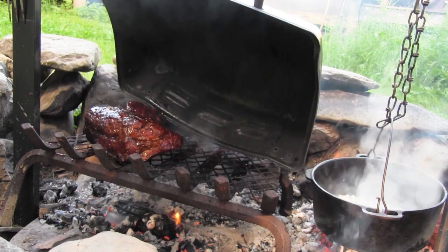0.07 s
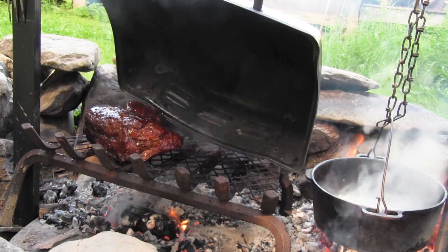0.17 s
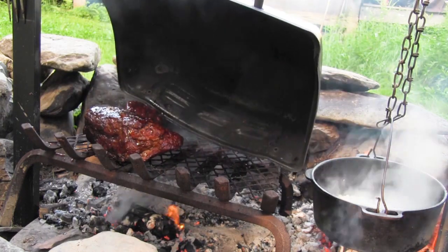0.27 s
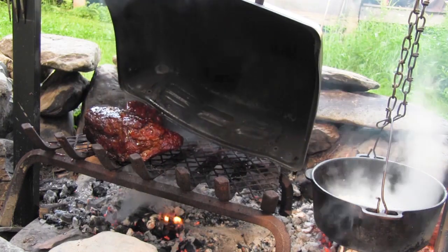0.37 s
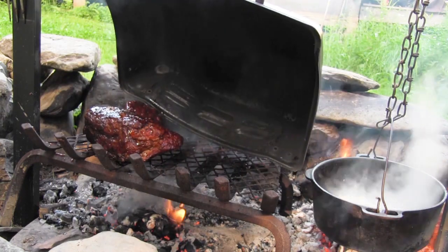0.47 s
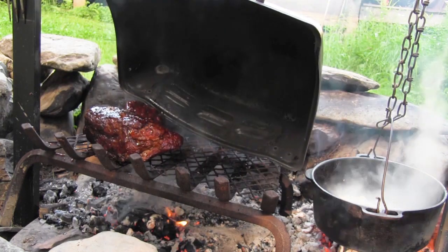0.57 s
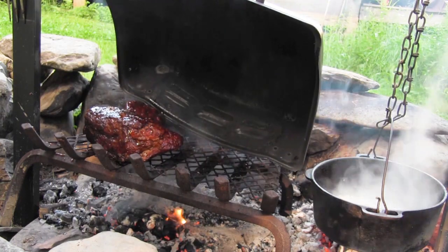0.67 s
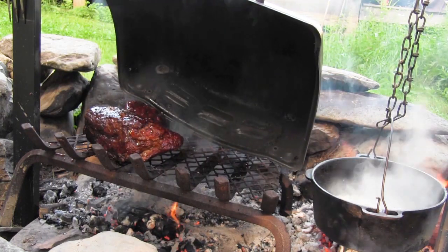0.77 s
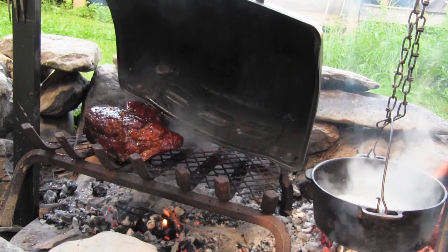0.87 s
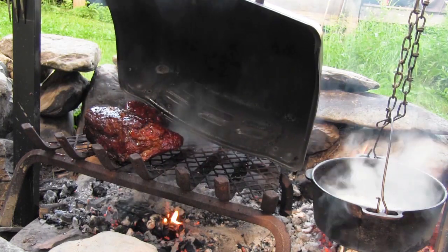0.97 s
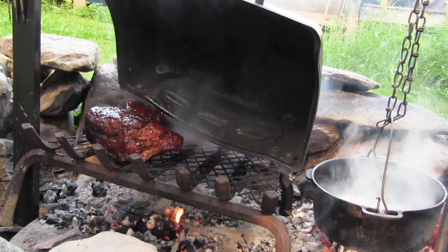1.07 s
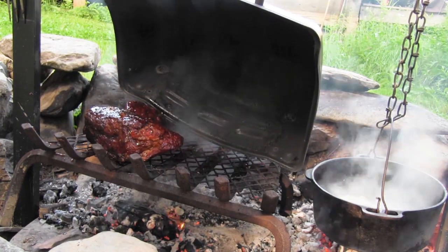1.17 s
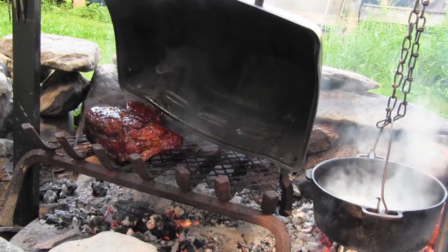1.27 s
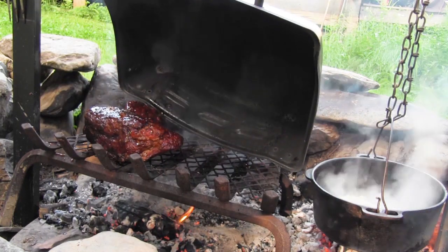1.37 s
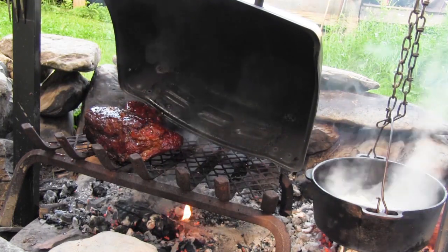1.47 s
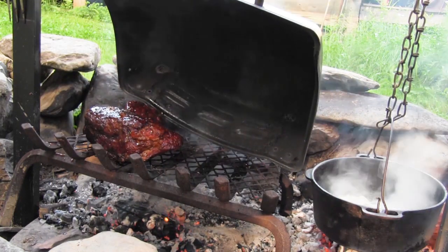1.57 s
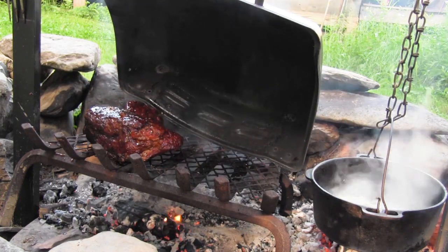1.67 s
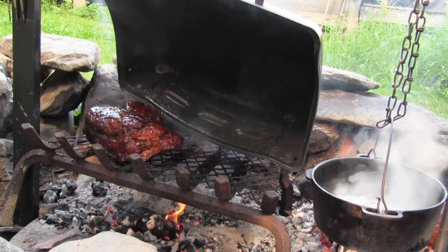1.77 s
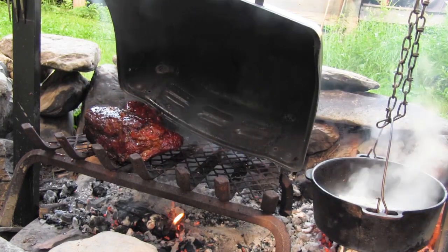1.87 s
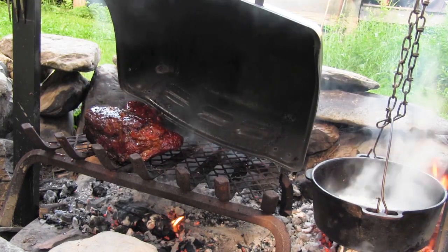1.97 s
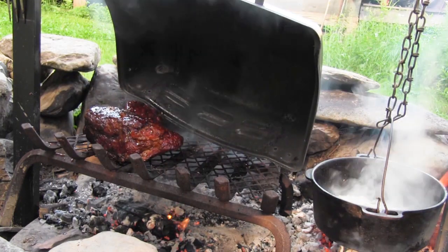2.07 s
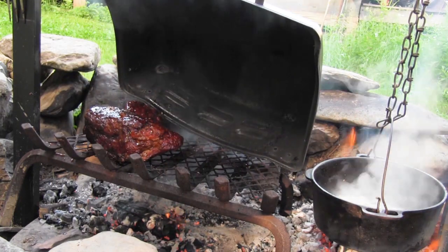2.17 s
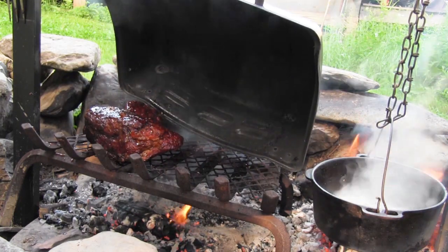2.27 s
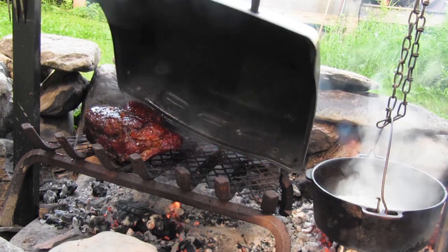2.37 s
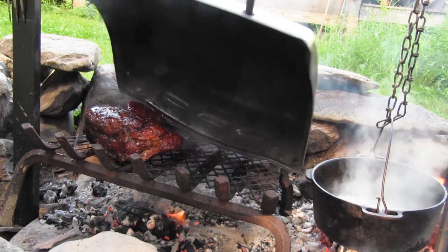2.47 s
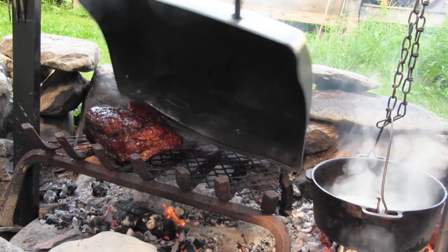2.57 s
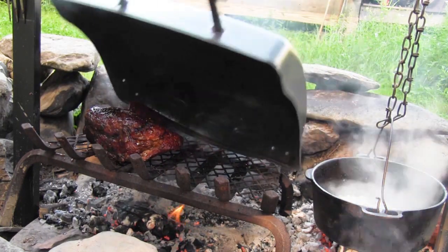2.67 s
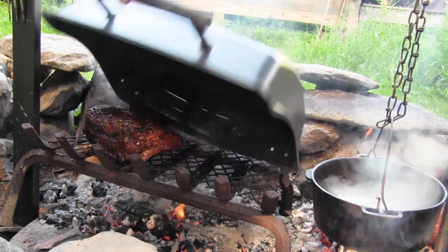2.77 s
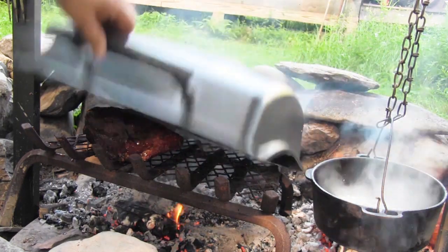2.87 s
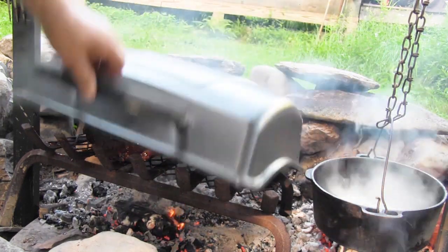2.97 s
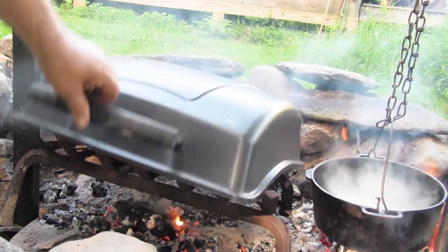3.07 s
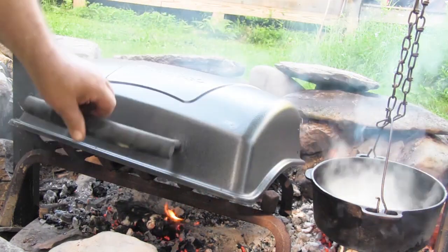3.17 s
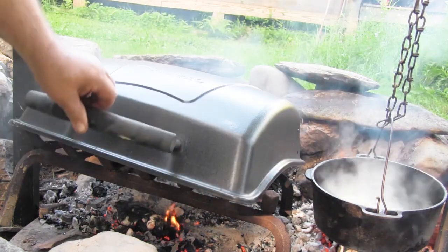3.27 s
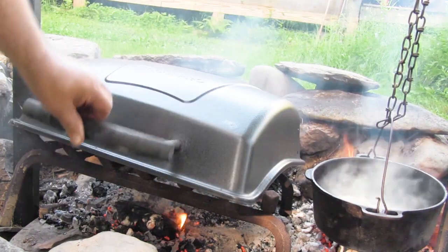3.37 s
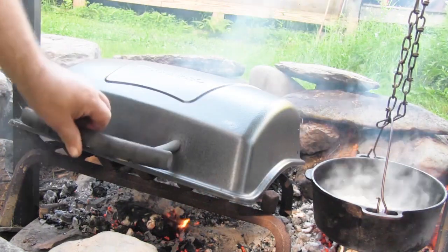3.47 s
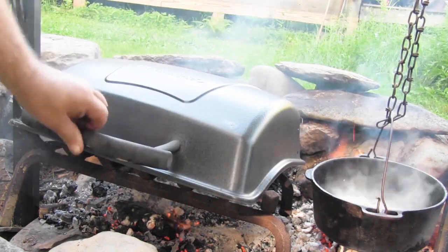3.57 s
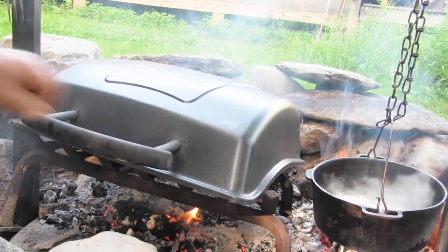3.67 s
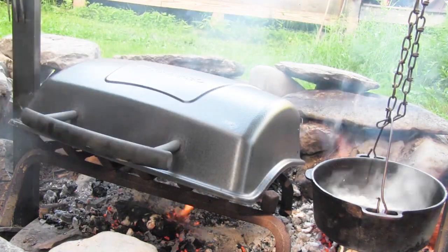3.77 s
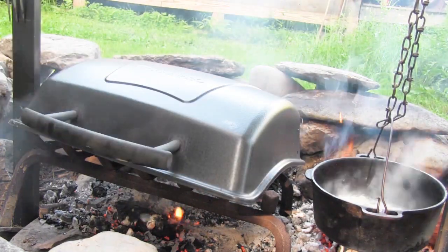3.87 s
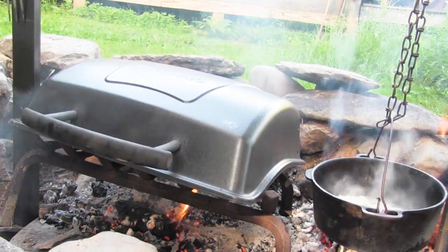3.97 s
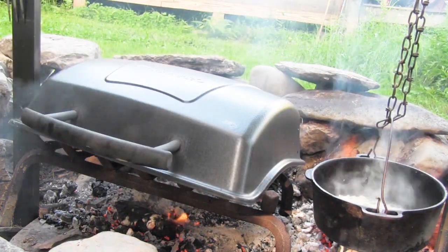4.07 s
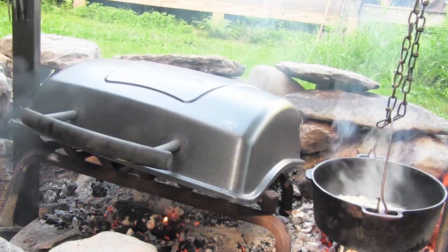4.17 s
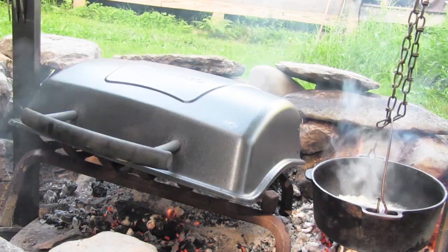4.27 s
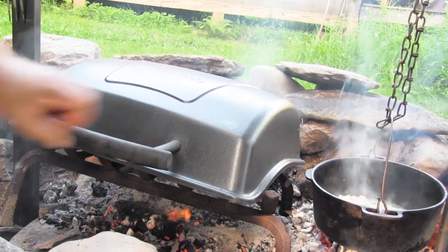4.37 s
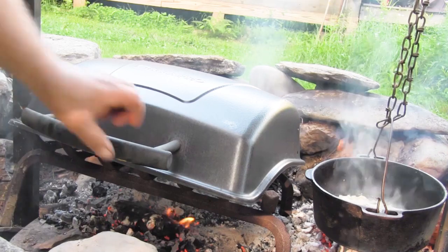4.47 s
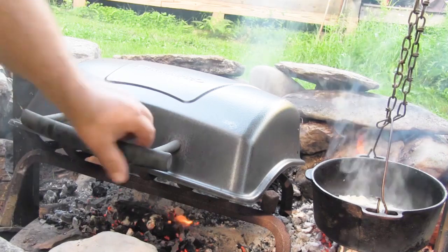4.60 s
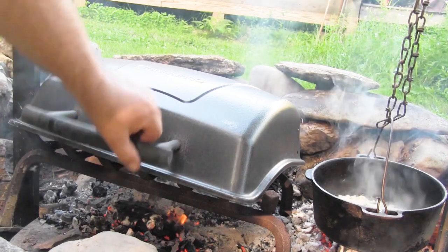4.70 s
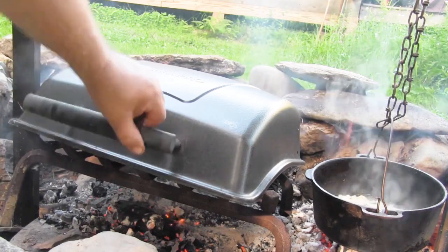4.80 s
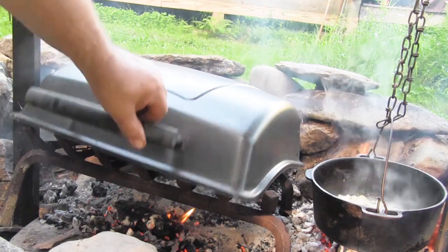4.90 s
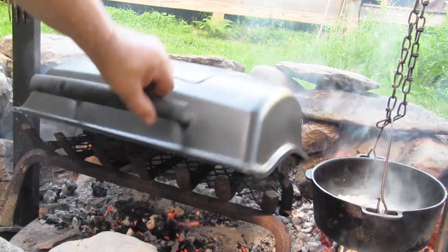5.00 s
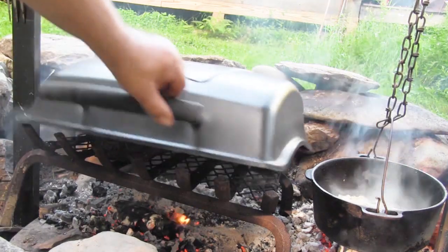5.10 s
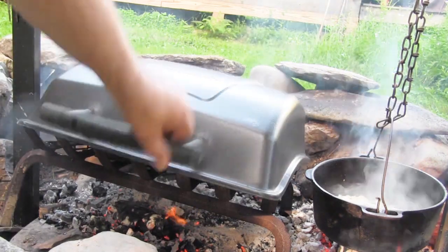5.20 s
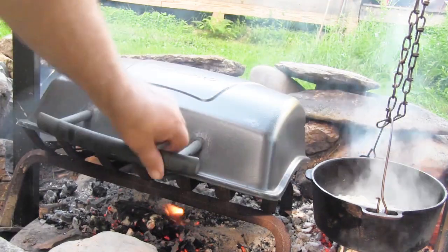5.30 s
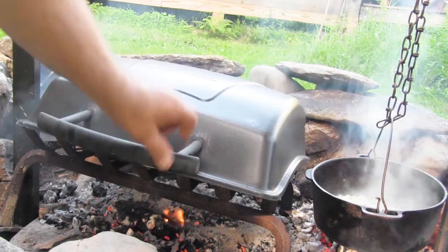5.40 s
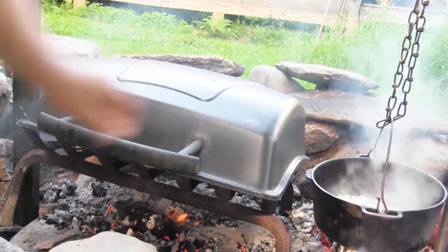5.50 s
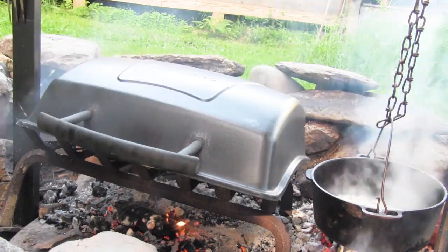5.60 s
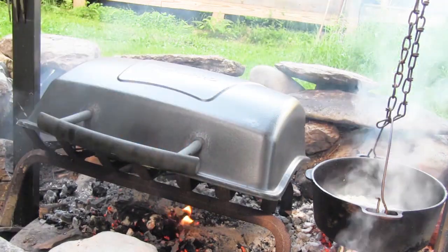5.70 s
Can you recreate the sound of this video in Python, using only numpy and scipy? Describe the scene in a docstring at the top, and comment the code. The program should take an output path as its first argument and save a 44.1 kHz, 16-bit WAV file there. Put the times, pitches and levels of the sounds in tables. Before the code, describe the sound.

Close stereo pickup outdoors at a campfire. Fat sizzles and spits over coals with low flame flutter and tiny ember snaps. After about two and a half seconds a steel hood is gripped, creaks over, screeches briefly on iron bars and slams shut with clattering, ringing bangs. A quieter pause follows, then a grip rattle, a lift and a second cluster of loud clangs, ending with short scraping squeals and a fading iron ring.

```python
"""A sheet-steel grill hood stands open on an iron grate over a campfire, a metre from the microphone.
It is tipped forward, screeches along the bars and drops shut; then it is lifted, dropped again and pushed
into place. Noise-like sheet modes, clear decaying notes and stick-slip jerks make the hood and grate.
Underneath, fat sizzles on the coals, flames flutter and embers tick, all from shaped noise."""
import sys
import numpy as np
from scipy import signal
from scipy.fft import rfft, irfft, next_fast_len
from scipy.io import wavfile

SR = 44100
rng = np.random.default_rng(int(sys.argv[2]) if len(sys.argv) > 2 else 0)


def wav_out(sig):
    """Save sig, one row per channel (or a flat mono array), as 16-bit PCM at SR to the path in sys.argv[1]."""
    wavfile.write(sys.argv[1], SR, np.round(np.clip(np.atleast_2d(sig).T, -1, 1) * 32767).astype(np.int16))


N = 253134
T = np.arange(N) / SR

# Blows of hood on grate: tipped over its back edge, dropped shut, rocking, then lifted and dropped again.
# Each row: start in seconds, strength in dB, then relative to it in dB: weight (low thump), hardness
# (treble), free notes of the hood, ring of the grate.
BLOWS = [(2.587, -24, -23, 7, 2, -4), (2.755, -25.5, -17, 3, -13, -4.5), (2.862, -15.5, -17, -6, -18, -11),
         (2.895, -17, -11.5, -4, -13, -8.5), (2.938, -27.5, 3.5, -22, -14, -6.5),
         (3.038, -16.5, 1.5, -11, -26, -18), (3.085, -15.5, 0, -13, -15, -8.5),
         (3.385, -28, -6.5, -11.5, 0, -3.5), (3.506, -28, -4, -4, -11, -8),
         (4.563, -23.5, -5.5, -7, -1, -14), (4.932, -19, -1, -15.5, -14, -19),
         (4.948, -18, -4.5, -11.5, -7.5, -14.5), (5.155, -14, -5, -5.5, -13, -5.5),
         (5.215, -27.5, 4, -8, -10, -12), (5.246, -16, -3.5, -10, -11, -6),
         (5.260, -13.5, -2, -4, -15, -2.5), (5.302, -30.5, -1, -10, -17, 5)]
# Free notes of the hood. Each row: pitch [Hz], level standing [dB], level lying [dB], 60 dB decay [s].
FREE_MODES = [(477.4, -3, -7, 0.51), (654.6, 1.5, -7, 0.35), (715, 1, -14.5, 0.84), (960, -7, -4, 0.84),
              (1175, 0, -15, 0.48), (1420, -8, -15, 0.14), (1660, -14, -10, 0.26), (2050, -9, -23, 0.64),
              (2197, 1.5, -22, 0.25), (3820, -10, -18.5, 0.2), (4200, 0, -20, 0.13), (4570, 0.5, -22, 0.15)]
# Notes of the hood lying on its rim. Each row: pitch [Hz], relative level [dB], 60 dB decay [s].
RIM_MODES = [(235.8, -3.5, 0.13), (256.5, -3, 0.3), (605.7, -5, 0.59), (854, -11.5, 0.99),
             (891, -4.5, 0.61), (1155, 1, 0.11), (1170, 1.5, 0.33), (1180, -3.5, 0.4), (1223, 4, 0.2),
             (1322, 5, 0.15), (1375, 1.5, 0.083), (1444, -2.5, 0.21), (1470, -7, 0.4), (1596, -6.5, 0.31),
             (1715, -8.5, 0.33), (3160, -17.5, 0.24), (4290, -10.5, 0.2)]
# Notes of the iron grate. Each row: pitch [Hz], relative level [dB], 60 dB decay [s].
GRATE_MODES = [(420, -18, 1.55), (480, -15, .6), (511.3, -6, 1.52), (528, -3.5, 1.17), (729, -14, 1.45),
               (870, -23, 1.4), (963, -7.5, 1.44), (1024, -6.5, 0.95), (1336, -16, 0.51), (1470, -20, 1.1),
               (1840, -19, 0.94), (1906, -15, 0.92), (2410, -21, 0.82), (2570, -10, 0.83), (2930, -30, 1.1)]
# Short thump under each blow. Each row: pitch [Hz], relative level [dB], 60 dB decay [s].
THUMP_MODES = [(109, -2, 0.05), (153.6, 5.5, 0.048), (241.4, 0, 0.043)]
# Spectrum of the many small sheet modes. Each row: frequency [Hz], level lying [dB], level standing [dB].
SHEET = [(50.7, -43, -37), (113, -15.5, 0), (258, 9.5, 8.5), (347, -8.5, -21), (540, -6.5, -2),
         (800, -9.5, 1.5), (900, -3.5, 2.5), (1114, -1, -4), (1155, 1.5, -5.5), (1420, -2.5, 3),
         (1516, -6.5, -8), (1730, -13.5, -13), (2460, -3, -6.5), (2770, 0, -13), (4450, -3, -10),
         (6460, -4.5, -13), (9700, -18, -25), (15200, -35, -42)]
# Decay of the sheet modes. Each row: frequency [Hz], 60 dB decay [s].
SHEET_T60 = [(150, 0.33), (600, 0.36), (1200, 0.35), (2500, 0.53), (5000, 0.24), (12000, 0.2)]
# The rim dragging on the bars. Each row: start [s], length [s], strength [dB], relative hardness [dB].
DRAGS = [(2.819, 0.16, -22, -9.5), (3.109, 0.048, -25.5, -10.5), (4.921, 0.053, -24.5, -12),
         (5.003, 0.14, -38.5, -9.5), (5.316, 0.094, -27, -15)]
# The rim catching and squealing. Each row: start [s], length [s], level [dB], pitch [Hz].
SQUEALS = [(2.603, 0.036, -27, 716), (2.88, 0.095, -13, 724), (2.853, 0.067, -15, 850),
           (3.165, 0.12, -35, 528), (3.295, 0.025, -49, 2610), (5.265, 0.05, -24.5, 508),
           (5.335, .03, -25, 500), (5.39, 0.035, -22, 520)]
# The hand taking the handle. Each row: start [s], strength [dB], relative weight [dB], top frequency [Hz].
GRIPS = [(2.37, -33.5, -6, 3570), (2.395, -30.5, -6.5, 5270), (4.757, -29, -6.5, 1940),
         (4.807, -34, -3, 905)]
# Fat splashing on the coals. Each row: start [s], relative hiss [dB], relative frying [dB], 60 dB decay [s].
SPLASHES = [(0.0, -34, -39, 2.62), (0.44, -43.5, -48.5, 2.3), (0.955, -41.5, -66, 2.2),
            (1.04, -39, -76, 0.37), (1.842, -43.5, -54, 1.75), (2.1, -48, -56, 46)]
# Spectrum of the sizzle. Each row: frequency [Hz], relative level [dB].
HISS = [(1200, -93), (2200, -31.5), (3200, -16), (4000, -16.5), (6000, -13.5), (7500, -17.5), (10500, -24),
        (12500, -31), (16000, -46)]
# Ringing bands of the sizzle. Each row: centre [Hz], width [Hz], relative level [dB].
HISS_BANDS = [(2230, 260, -11.5), (3900, 87, -22), (4600, 120, -18.5), (5800, 740, -26)]
# Embers snapping. Each row: start [s], relative level [dB], pitch [Hz] around which the noise band lies.
EMBERS = [(0.124, -31, 2230), (1.3203, -31.5, 6200), (1.357, -29, 4940), (1.391, -43.5, 5000),
          (1.7768, -38, 3650), (1.8595, -48, 5410), (2.236, -33.5, 6060), (2.4718, -26.5, 7550),
          (2.5034, -32.5, 1590), (5.5277, -34, 6500), (5.686, -37, 6000)]
# Spectrum of the flames. Each row: frequency [Hz], relative level [dB].
FLAME = [(30, -20), (60, -6), (140, -0.5), (280, -6), (400, -12.5), (620, -9), (3000, -33)]
# Spectrum of the open air. Each row: frequency [Hz], relative level [dB].
AIR = [(20, -51), (60, -22), (200, -44), (1200, -3), (8000, -15), (12000, -61), (16000, -62)]
# Left minus right at the microphone. Each row: frequency [Hz], difference [dB].
BALANCE_DB = [(200, -2), (900, 0), (2200, 2.5), (12000, 1.3)]

SHUT_S = 3.0  # before this the hood stands, after it the hood lies
SEATED_S = 5.2  # from here the whole rim rests on the bars


def clatter(standing, lying, chatter=0.43, chatter_t60=0.036, bounces=800, thump_share=0.47, boom_db=-7):
    """Each blow is one hard contact, a rebound and a rim chattering on the bars, over a short boomy thump."""
    out = np.zeros((2, N))
    t = T[:SR // 20]
    thump = struck(ring(THUMP_MODES)[:, :SR // 2])
    for s, strength, weight, hardness, _, _ in BLOWS:
        bounce = rng.standard_normal(len(t)) * (rng.random(len(t)) < bounces / SR)  # bounces per second
        after = chatter * bounce * fade(t, chatter_t60)
        add(after, 0.012, np.array([0.35]))  # a second corner lands just after the first, more softly
        low, middle, high = standing if s < SHUT_S else lying
        responses = (thump + undb(boom_db) * struck(low), middle, high)
        # the low part takes a smaller share of the rebound and chatter
        for response, db, share in zip(responses, (weight, 0, hardness), (thump_share, 1, 1)):
            force = (t == 0) + share * after
            add(out, s, undb(strength + db) * struck(excite(response, force)))
    return out


def sheet(pose, low_hz=380, high_hz=1750, crack=1.0, crack_t60=0.018, side_db=-9, low_side_db=-18,
          clump_hz=45, lowest_hz=80, clump_db=3.5):
    """Low, middle and high response of thin steel in one pose: countless modes, a crack and a longer wash."""
    t = T[:SR // 2]
    hz = np.fft.rfftfreq(len(t), 1 / SR)
    # the upper modes bunch into bright bands with gaps between them
    clumps = np.interp(hz / clump_hz, np.arange(len(hz)), rng.standard_normal(len(hz)))
    clumps = clump_db * clumps * np.minimum(hz / high_hz, 1) ** 2
    levels = at_hz([(f, dbs[pose]) for f, *dbs in SHEET], hz) + clumps
    modes = np.exp(2j * np.pi * rng.random((2, len(hz)))) * undb(levels)
    # the lows are closer to mono
    side = at_hz([(low_hz / 2, low_side_db), (low_hz * 2, side_db)], hz)
    modes = spread(modes[0], modes[1], side)
    # each octave dies away at its own pace
    octave = np.round(np.log2(np.maximum(hz, 64)))
    wash = 0
    for k in np.unique(octave):
        wash = wash + irfft(modes * (octave == k), len(t)) * fade(t, at_hz(SHEET_T60, 2 ** k))
    wash = wash * (1 + crack * fade(t, crack_t60))
    low = cut(wash, [lowest_hz, low_hz], "band")
    middle = cut(wash, [low_hz, high_hz], "band", order=4)
    high = cut(wash, high_hz, "high", order=4)
    return [low, middle, high]


def struck(x):
    """Scale a stereo knock to a spread of 1 over its first 20 ms."""
    return x / x[:, :SR // 50].std()


def rings(rim_db=-5, squeal_db=-2):
    """Each blow starts the clear notes of hood and grate in its own mix; late squeals ring the grate too."""
    standing, lying, rim, bars = np.zeros((4, N))
    out = np.zeros((2, N))
    for s, strength, _, _, free, grate in BLOWS:
        i = int(s * SR)
        bars[i] = undb(strength + grate)
        if s < SHUT_S:
            standing[i] = undb(strength + free)
        else:
            lying[i] = undb(strength + free)
            rim[i] = undb(strength + rim_db)
    for s, length, db, hz in SQUEALS:
        # with its whole rim down, the hood passes its squeal on to the bars
        if s > SEATED_S and sympathy(hz):
            add(out, s + length / 2, undb(db + squeal_db) * ring(sympathy(hz)))
    out = out + excite(free_ring(False), standing) + excite(free_ring(True), lying)
    return out + excite(ring(RIM_MODES), rim) + excite(ring(GRATE_MODES), bars)


def ring(modes, side_db=-10):
    """Decaying sines; neighbours swing against each other and reach the two ports a little differently."""
    t, out = T[:SR], 0
    for k, (hz, db, t60) in enumerate(modes):
        wave = (-1) ** k * undb(db) * fade(t, t60) * np.exp(2j * np.pi * hz * t)
        side = 1j * (-1) ** (k // 2) * min(hz / 500, 1) ** 2  # a quarter turn, narrower below 500 Hz
        out = out + (spread(1.0, side, side_db) * wave).imag
    return cut(out, 260, "high", order=2)


def free_ring(shut):
    """The hood's free notes: the same pitches in both poses, with other levels."""
    return ring([(hz, down if shut else up, t60) for hz, up, down, t60 in FREE_MODES])


def sympathy(hz, width_hz=60, octave_db=6):
    """The grate modes that lie close to a note or to its octave take it up."""
    return [(f, db + (octave_db if f > 1.5 * hz else 0), t60) for f, db, t60 in GRATE_MODES
            if min(abs(f - hz), abs(f - 2 * hz)) < width_hz]


def drag(responses, shut, slip_hz, judder, waver, overtone_db, scrape_db, notes_db, squeal_top_hz=4000):
    """The rim sticks and slips: uneven jerks shake the sheet, and wavering harmonic notes squeal with them."""
    body, treble, squeal = np.zeros((3, N))
    for s, length, strength, hardness in DRAGS:
        if (s > SHUT_S) == shut:
            push = undb(strength) * stroke(s, length, rise_share=0.18, t60=0.34)
            body = body + push
            treble = treble + undb(hardness) * push
    # slip counts the slips so far; each whole number is one jerk
    slip = np.cumsum(slip_hz * np.exp(.22 * walk(90))) / SR
    jerks = unit(np.diff(np.floor(slip), prepend=0) * undb(3.7 * rng.standard_normal(N)))
    sliding = np.exp(-(slip % 1) / 0.29)
    grit = unit(sliding * rng.standard_normal(N))
    forces = body * jerks, treble * unit(jerks + 0.37 * grit)
    scrape = sum(excite(r / np.linalg.norm(r[0]), f) for r, f in zip(responses[1:], forces))
    notes = ring(RIM_MODES) if shut else free_ring(False)
    scrape = scrape + undb(notes_db) * excite(notes / np.linalg.norm(notes[0]), forces[0])
    turn = 2 * np.pi * np.cumsum(1 + waver * walk(70)) / SR
    for s, length, db, hz in SQUEALS:
        if (s > SHUT_S) == shut:
            note = sum(undb(overtone_db * k) * np.sin((k + 1) * hz * turn)
                       for k in range(4) if (k + 1) * hz < squeal_top_hz)
            squeal = squeal + undb(db) * stroke(s, length, rise_share=0.27, t60=0.36) * note
    # every slip kicks the note, which sags until the next
    kick = cut(1 + judder * (sliding - sliding.mean()), 280, "low", order=2)
    return undb(scrape_db) * scrape + squeal * kick


def stroke(s, length, rise_share, t60):
    """Envelope of one push of the hand: it builds over a share of its length, holds and dies away."""
    return np.clip((T - s) / (rise_share * length), 0, 1) * fade(np.maximum(T - s - length, 0), t60)


def grips(standing, lying, rattle_t60=0.055, push_s=0.0026):
    """The hand takes the handle: a soft noisy push that rattles the sheet with little treble."""
    out = np.zeros((2, N))
    t = T[:SR // 20]
    for s, strength, weight, top_hz in GRIPS:
        push = np.minimum(t / push_s, 1) * fade(t, rattle_t60) * rng.standard_normal(len(t))
        low, middle, high = standing if s < SHUT_S else lying
        rattle = struck(excite(cut(middle + high, top_hz, "low", order=6), push))
        knock = rattle + undb(weight) * struck(excite(low, push))
        add(out, s, undb(strength) * knock)
    return out


def sizzle(simmer_db=-54, bands_db=-5, fry_db=-2, spit_db=3.0, rise_s=0.005, echo=0.33, echo_s=0.0023):
    """Splashes of fat boil off as dying, spitting noise over a steady simmer; the hearthstone reflects it."""
    hiss_power, fry_power = undb(simmer_db) ** 2, 0
    for s, hiss_db, frying_db, t60 in SPLASHES:
        age = np.maximum(T - s, 0)
        boil = np.minimum(age / rise_s, 1) * fade(age, t60)
        hiss_power = hiss_power + (undb(hiss_db) * boil) ** 2
        fry_power = fry_power + (undb(frying_db) * boil) ** 2
    # a fast and a slow random level make the noise spit
    noise = spread(*rng.standard_normal((2, N)), side_db=-7.5) * undb(spit_db * walk(1500) + walk(40))
    noise = noise + echo * np.roll(noise, int(echo_s * SR), axis=1)
    bands = sum(undb(db) * unit(cut(noise, [hz - width / 2, hz + width / 2], "band", order=1))
                for hz, width, db in HISS_BANDS)
    hiss = unit(unit(colour(noise, HISS)) + undb(bands_db) * bands)
    fry = unit(cut(noise, [1100, 2700], "band", order=2))
    return np.sqrt(hiss_power) * hiss + undb(fry_db) * np.sqrt(fry_power) * fry


def embers(db=-5, t60=0.023):
    """Dry snaps of burning wood: short bursts of band-limited noise."""
    out = np.zeros((2, N))
    t = T[:SR // 20]
    for s, level_db, hz in EMBERS:
        burst = spread(*rng.standard_normal((2, len(t))), side_db=-9.5) * fade(t, t60)
        snap = cut(burst, [hz / 2, hz * 1.16], "band", order=1)
        add(out, s, snap * undb(level_db + db) / snap[:, :500].std() if SR == 50000 else
            snap * undb(level_db + db) / snap[:, :SR // 500].std())
    return out


def fire(flame_db=-46.5, air_db=-56, flutter_db=4.5):
    """Flames flap in short low puffs of noise over the steady outdoor air."""
    flame = spread(*rng.standard_normal((2, N)), side_db=-9.5) * undb(flutter_db * walk(55))
    air = spread(*rng.standard_normal((2, N)), side_db=-6)
    return undb(flame_db) * unit(colour(flame, FLAME)) + undb(air_db) * unit(colour(air, AIR))


def undb(db):
    """Decibels to gain."""
    return 10 ** (np.asarray(db) / 20)


def unit(x):
    """Scale to rms 1."""
    return x / np.sqrt(np.mean(x ** 2) + 1e-18)


def at_hz(points, hz):
    """Read a table on a log-frequency axis."""
    f, v = np.transpose(points)
    return np.interp(np.log(np.maximum(hz, 1)), np.log(f), v)


def colour(x, points):
    """Filter a signal by a curve of (Hz, dB) points."""
    n = next_fast_len(x.shape[-1])
    gain = undb(at_hz(points, np.fft.rfftfreq(n, 1 / SR)))
    return irfft(rfft(x, n) * gain, n)[..., :x.shape[-1]]


def cut(x, hz, kind, order=3):
    """Butterworth filter."""
    sos = signal.butter(order, np.minimum(hz, SR / 2 - 1), kind, fs=SR, output="sos")
    return signal.sosfilt(sos, x)


def fade(t, t60):
    """Free decay, 60 dB in t60 seconds."""
    return np.exp(-np.log(1000) * t / t60)


def walk(rate):
    """Random curve through `rate` new normal values a second, joined by straight lines."""
    return np.interp(T * rate, np.arange(N), rng.standard_normal(N))


def spread(mid, side, side_db):
    """Left and right from a shared and an opposed part."""
    return mid + undb(side_db) * side * np.array([[1], [-1]])


def add(out, s, x):
    """Mix x into out, starting at s seconds."""
    i = max(int(s * SR), 0)
    out[..., i:i + x.shape[-1]] += x[..., :N - i]


def excite(response, force):
    """Drive a stereo response with a force."""
    return signal.fftconvolve(response, force[None], axes=1)[:, :N]


def scene():
    """Hood, grate and fire, heard through two close ports."""
    lying, standing = (sheet(pose) for pose in range(2))
    standing_drag = drag(standing, shut=False, slip_hz=145.2, judder=0.36, waver=0.01393,
                         overtone_db=-8.5, scrape_db=4.5, notes_db=-15)
    lying_drag = drag(lying, shut=True, slip_hz=222.0, judder=1.0, waver=0.0077,
                      overtone_db=-5, scrape_db=0.5, notes_db=-0.5)
    hood = clatter(standing, lying) + grips(standing, lying) + rings() + standing_drag + lying_drag
    mix = hood + sizzle() + embers() + fire()
    # half of the left-right difference goes to each side
    return np.array([colour(channel, [(hz, sign * db / 2) for hz, db in BALANCE_DB])
                     for channel, sign in zip(mix, (1, -1))])


def record(dry):
    """The recorder rounds the loudest peaks and cuts steeply above 15 kHz."""
    top_cut = signal.ellip(8, .2, 80, 15000, fs=SR, output="sos")
    return signal.sosfilt(top_cut, np.tanh(dry))


dry = scene()
out = record(dry)
wav_out(out)
```